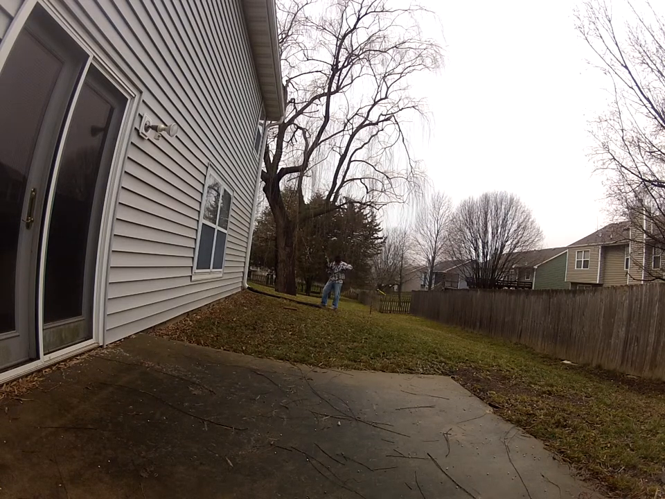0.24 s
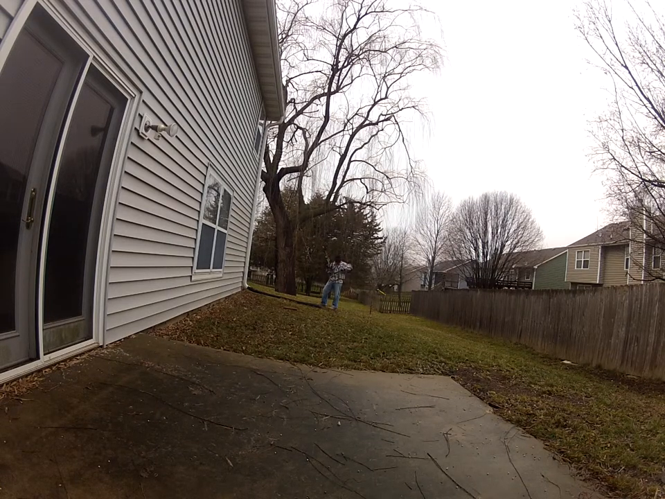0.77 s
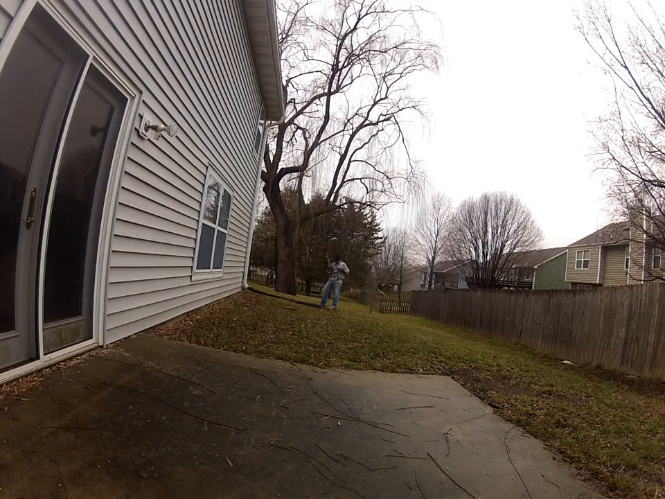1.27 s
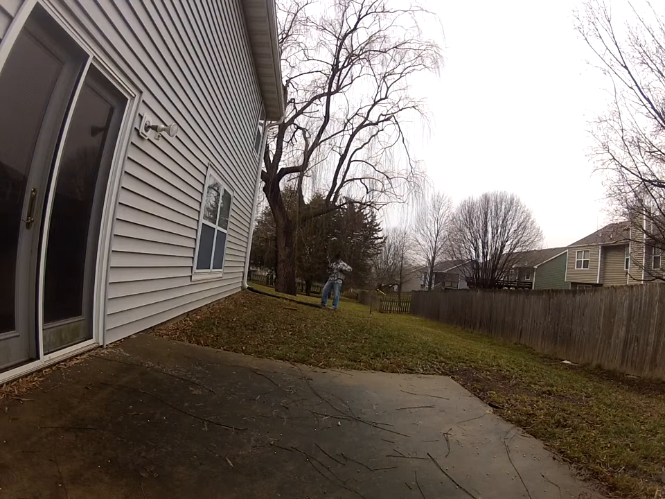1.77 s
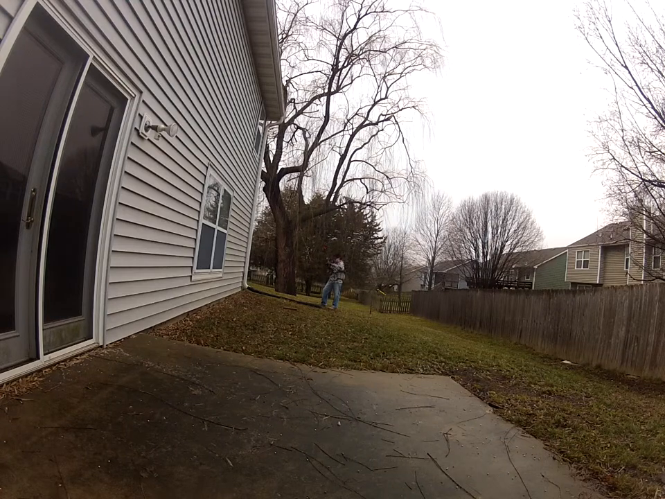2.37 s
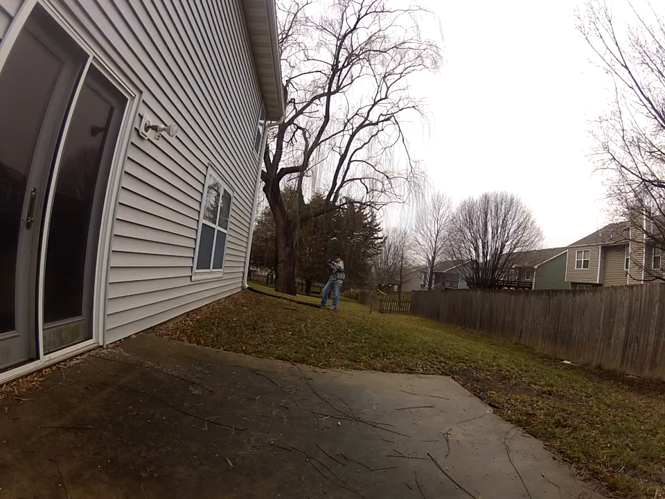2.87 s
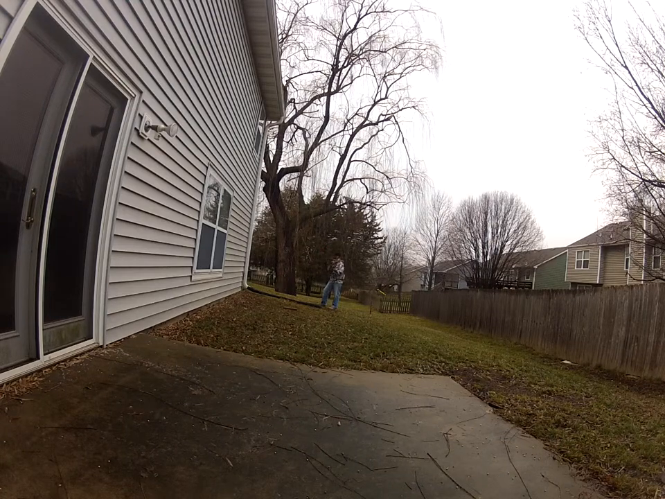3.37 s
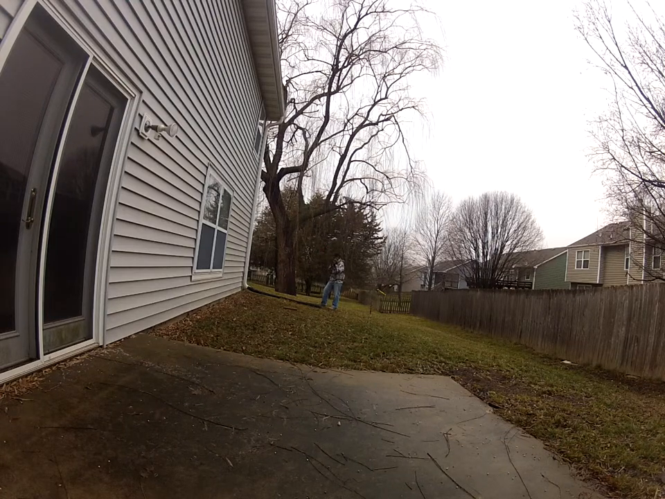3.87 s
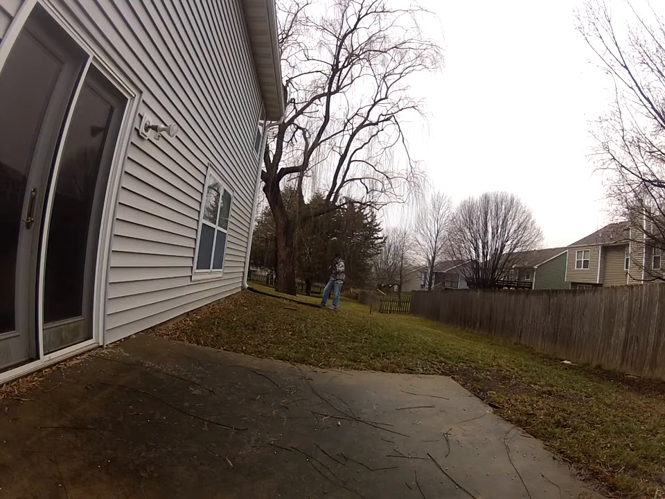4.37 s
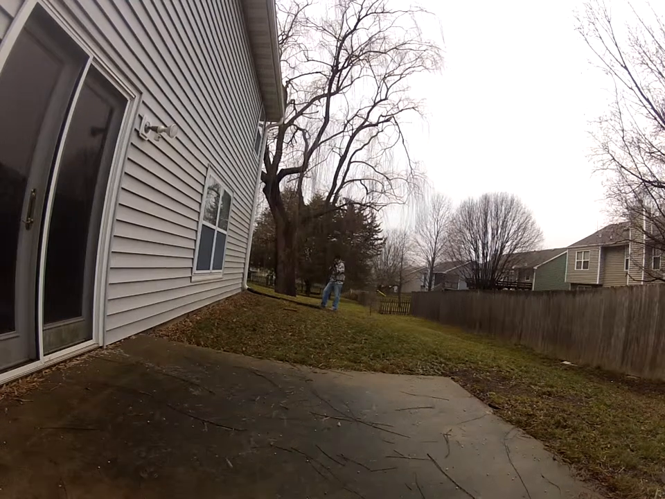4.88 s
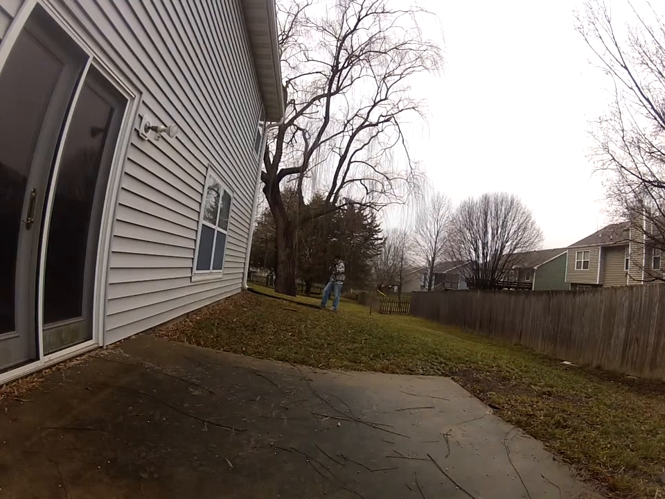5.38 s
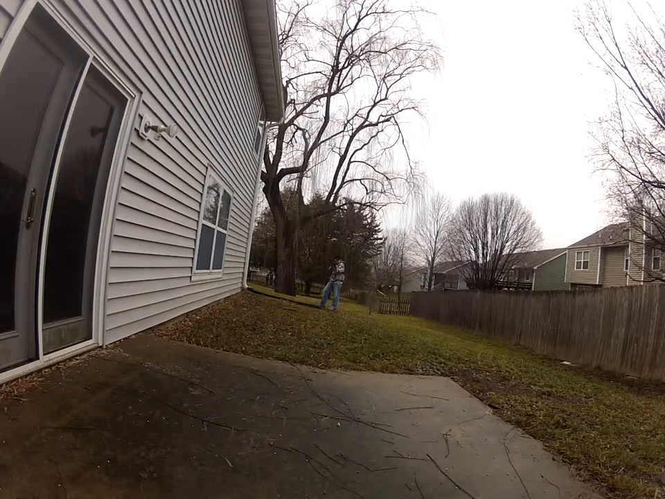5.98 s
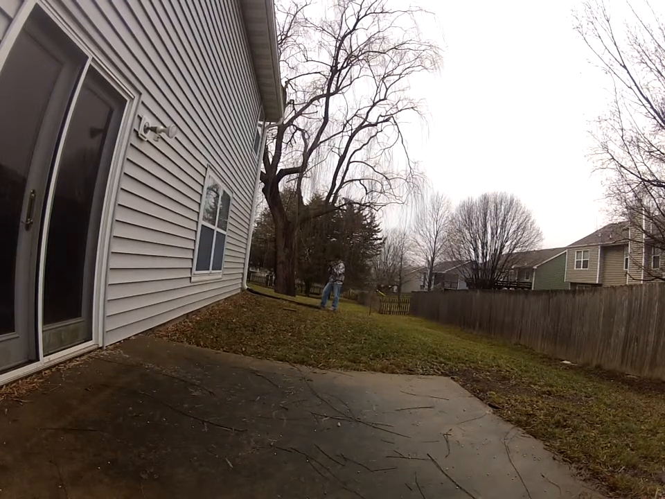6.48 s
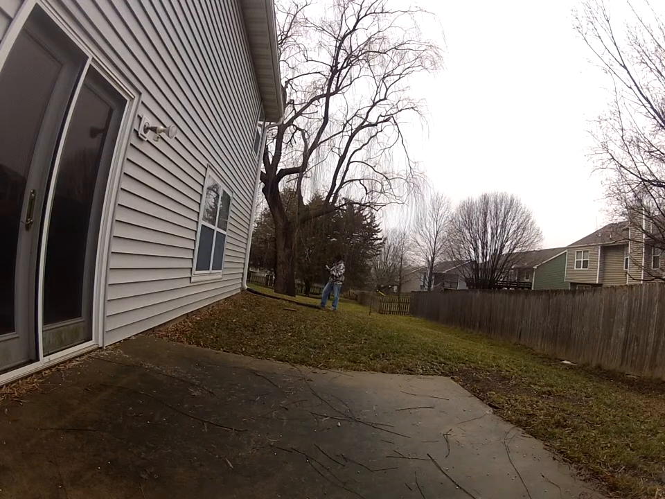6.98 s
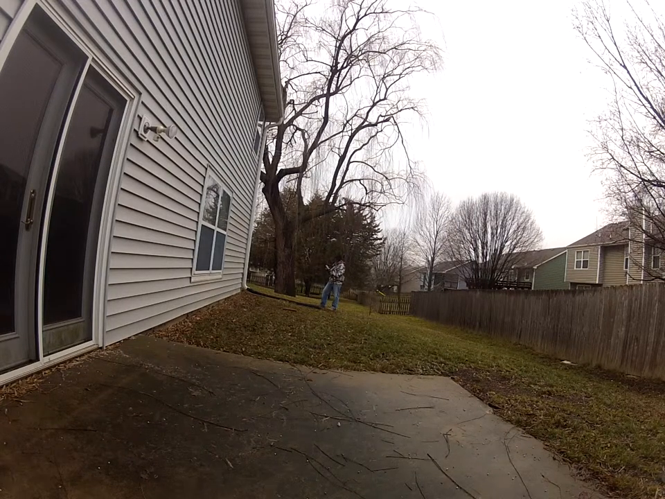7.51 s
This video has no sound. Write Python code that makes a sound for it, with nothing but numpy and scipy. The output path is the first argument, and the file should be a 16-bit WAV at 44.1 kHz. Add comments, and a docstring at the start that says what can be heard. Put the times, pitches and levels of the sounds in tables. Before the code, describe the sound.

Quiet yard with distant traffic rumble, then motorized toy-rifle shots and violent pellet smacks right on the microphone's plastic case, rattling and ringing before falling quiet.

```python
"""An airsoft rifle fires four times across a back yard at a helmet that carries a camera in a plastic case.
Each shot is motor noise, a falling-off low tone and a burst of noise. Three pellets strike: fading tones and
noise overload the microphone, the gain dives, and the helmet's ring and rattle swell as it recovers.
One pellet only grazes, with soft thuds and clicks; strays clack on the house siding as short ringing noise,
and one faint tick comes late. Before the shots, a few scuffs of shaped noise over a far traffic rumble,
which is low-pitched noise."""
import sys
import numpy as np
from scipy import signal
from scipy.fft import rfft, irfft, next_fast_len
from scipy.io import wavfile
from scipy.ndimage import uniform_filter1d

SR = 44100
rng = np.random.default_rng(int(sys.argv[2]) if len(sys.argv) > 2 else 0)


def int16_out(signal):
    """Quantize to a 16-bit WAV file."""
    q = np.round(np.clip(np.atleast_2d(signal).T, -1, 1) * 32767)
    wavfile.write(sys.argv[1], SR, q.astype(np.int16))


N = 341598
T = np.arange(SR) / SR  # one second of time, the length of each single sound

# Direct hits; where one lands sets its body tones, its chatter and how the mount shakes:
# start_s, push_hz, push_db, knock_hz, knock_db, flex_hz, flex_db, shell_db, spread_s, chatter_s,
# sway_db, shake_db (sway_db and shake_db are relative)
DIRECT_HITS = [(4.7371, 44, 8.5, 546, 2.5, 310, 2, -8.5, 0.0023, 0.012, 1, -2.5),
               (5.6436, 115.9, -1, 710, -3.5, 1940, -2.5, -8.5, 0.0012, 0.0078, -16.5, -15.5),
               (6.1167, 41.9, 2, 653, 6.5, 197.3, 4, -7.5, .001, 0.0051, -1.5, -6.5)]
# Ringing tones of the camera's plastic case: pitch_hz, relative_level_db, t60_s (time to fall 60 dB)
SHELL_TONES = [(957, -8.5, 0.045), (1200, -13, 0.085), (1642, -6.5, .04), (1919, -3.5, 0.07),
               (2644, -5.5, 0.013), (3024, -4, .022), (3788, 1.5, 0.031), (4210, -3.5, 0.014),
               (4390, -5, .022), (5110, -0.5, .018), (5557, -5, 0.015), (6690, -5.5, 0.024),
               (7270, -8, 0.03), (8190, -3.5, 0.022)]
# The camera swinging on its mount: pitch_hz, relative_level_db, t60_s
MOUNT_SWAY = (102, -17.5, 0.52)
# Ringing tones of the helmet: pitch_hz, relative_level_db, t60_s
HELMET_TONES = [(261, -13.5, .22), (425, -40, 1), (705, -33, .64), (718, -7, 0.074)]
# A glancing pellet touches twice: start_s, thud_db, thud_hz, click_db, click_ring_hz
GRAZE_TOUCHES = [(5.2099, 6, 370, -28, 2200), (5.227, -9.5, 252, -14, 4870)]
# Clacks of stray pellets on hard things nearby, and one late faint tick:
# start_s, clack_db, t60_s, ring_hz, tail_db, boom_db
CLACKS_AND_TICK = [(5.4978, -35.5, 0.02, 1202, -42.5, -48), (5.7378, -24, 0.05, 2600, -26, -31),
                   (5.783, -11.5, 0.019, 3300, -32.5, -24.5), (5.788, -8.5, 0.02, 4440, -32.5, -58),
                   (7.556, -38.5, 0.01, 2970, -85, -88.5)]
# Scuffs of clothes and feet: start_s, level_db, rise_s, low_edge_hz, high_edge_hz, ring_hz
SCUFF_STROKES = [(.905, -61, 0.028, 1810, 3900, 2180), (2.3541, -49.5, 0.0015, 340, 1590, 574),
                 (2.511, -53, 0.016, 380, 1900, 1260), (2.636, -48, 0.0044, 450, 20000, 2970),
                 (2.652, -40, 0.0053, 350, 13000, 1160), (3.199, -62, 0.063, 1490, 4500, 2100),
                 (3.279, -54.5, 0.0012, 2700, 14000, 4800)]
# How the case colours all sound from outside: frequency_hz, level_db
CASE_COLOUR = [(60, -2.5), (400, 2), (650, 0), (850, -15), (1500, -15), (1800, -15.5), (3000, -11.5),
               (4700, -8), (6100, -25), (7500, -12), (9000, -20), (10500, -31), (13000, -32),
               (15000, -29.5)]
# Colour of the case's chatter: frequency_hz, level_db
CRACK_COLOUR = [(80, -11), (230, 7.5), (450, 10), (850, 2), (1700, -0.5), (4000, -9), (8000, -8),
                (11000, -17.5), (15000, -19)]
# Colour of hard plastic contact: frequency_hz, level_db
CLACK_COLOUR = [(500, -0.5), (1000, 3.5), (2200, 6), (4500, -4.5), (8000, 0), (15000, 7)]
# Colour of rubbing cloth: frequency_hz, level_db
CLOTH_COLOUR = [(200, 9.5), (600, 3.5), (1500, 10), (2800, 8), (4200, 2), (7000, 6), (15000, 14)]
# Colour of far traffic and hiss: frequency_hz, level_db
AIR_COLOUR = [(20, -12), (45, -3), (75, -1.5), (135, -1), (200, -4.5), (350, -11.5), (650, -17.5),
              (950, -26.5), (2800, -32.5), (5000, -38), (8000, -41.5), (15000, -44.5), (16500, -61.5)]
# Phase mismatch of the two channels: frequency_hz, side_over_mid_db
CHANNEL_SKEW = [(60, -26), (250, -25.5), (600, -31), (2000, -29), (12000, -32)]

FLIGHT_S = 0.0755  # from each report to its pellet's arrival
REPORT_DB = -30  # every report is equally loud
WINDUP_S, REPORT_ATTACK_S = 0.068, 0.0013
CRACK_DB, RING_DB = -1, -0.5  # the crack over the shell's level; the helmet rings alike for every hit
BUZZ_DB, ECHO_DB = -7, -35  # over the hit's shake level
# The mount clacks at both ends of each swing
RATTLE_DELAY_S, RATTLE_JITTER_S = 0.0315, 0.001  # first clack after the hit; random shift either way
RATTLE_DB, BACKSWING_DB = 1, -6  # over the hit's shake level; the weaker end compared with the other
RATTLE_LOSS_DB_PER_S, RATTLE_SCATTER_DB = 260, 5  # loss of strength; random level either way
RATTLE_LOOSE_S = 0.11  # by this age a swing has an even chance of still reaching a stop
CLACK_ATTACK_S = 0.0003
CLACK_EDGE = 0.69  # a clack's low edge as a share of its ring frequency
YARD_T60_S, YARD_DB = 0.56, -18  # the yard's long answer, compared with a clack's tail
# A slow stroke also dies slowly: base t60, then extra t60 per second of rise
SCUFF_T60_S, SCUFF_LINGER = 0.22, 3.8
TRAFFIC_DB = -55
# The rumble is a little stronger at first: time of its peak, length, centre, level
SWELL_S, SWELL_LENGTH_S, SWELL_HZ, SWELL_DB = 0.6, 0.61, 127, -56
TOP_HZ = 15700  # the highest pitch that gets through


def amp(db):
    """Turn decibels into a plain multiplier."""
    return 10 ** (np.asarray(db) / 20)


def unit(x):
    """Scale a sound to an average (rms) strength of 1."""
    return x / np.sqrt(np.mean(x ** 2) + 1e-20)


def colour(points, hz):
    """Read a gain curve from its points, joined by lines on a log frequency axis."""
    point_hz, db = np.transpose(points)
    return amp(np.interp(np.log(hz + 1), np.log(point_hz), db))


def filtered(x, response):
    """Make each frequency of x stronger or weaker, or shift its phase, as the response says."""
    size = next_fast_len(x.shape[-1] + 8192)  # spare room so the end does not wrap to the start
    spectrum = rfft(x, size) * response(np.fft.rfftfreq(size, 1 / SR))
    return irfft(spectrum, size)[..., :x.shape[-1]]


def noise(response, size=SR):
    """Coloured noise of rms 1."""
    return unit(filtered(rng.standard_normal(size), response))


def outside(points, edge_hz, top_hz=30000, ring_hz=0, ring_db=4):
    """Noise between a low and a high edge, with a resonance at ring_hz, heard through the case."""
    def response(hz):
        low_edge = 1 / np.hypot(1, (edge_hz / (hz + 1)) ** 4)
        high_edge = 1 / np.hypot(1, (hz / top_hz) ** 2)
        ring = 1 + amp(ring_db) / (1 + ((hz - ring_hz) / (0.06 * ring_hz + 1)) ** 2)
        return colour(CASE_COLOUR, hz) * colour(points, hz) * low_edge * high_edge * ring
    return noise(response)


def fade(t60):
    """A smooth dying away that falls 60 dB in t60 seconds."""
    return np.exp(-np.log(1000) * T / t60)


def rise(seconds):
    """A soft start."""
    return 1 - np.exp(-(T / seconds) ** 2)


def tone(hz, phase=0):
    """One second of a sine, the purest tone."""
    return np.sin(2 * np.pi * hz * T + phase)


def grains(depth_db):
    """A gain that wanders at random within about two milliseconds, which sounds gritty."""
    return amp(depth_db * unit(uniform_filter1d(rng.standard_normal(SR), size=90)))


def add(track, s, sound):
    """Mix a sound into the track at time s."""
    part = track[round(s * SR):][:len(sound)]
    part += sound[:len(part)]


def rifle(motor_db=-21, thump_db=3, thump_hz=370, port_lag=0.0029, yard_db=-18):
    """The motor winds the piston back, then the piston thumps and the report scatters along the wall.

    The levels here are relative to the report."""
    out = np.zeros(N)
    # same path, so the same pattern for each shot
    report = noise(lambda hz: colour(CASE_COLOUR, hz)) * fade(0.24) * rise(REPORT_ATTACK_S)
    windup = np.clip(T / WINDUP_S, 0, 1) ** 0.81 * (T < WINDUP_S)
    for arrival, *_ in DIRECT_HITS + GRAZE_TOUCHES[:1]:
        s = arrival - FLIGHT_S
        gears = outside(CLACK_COLOUR, edge_hz=860) * windup
        thump = -amp(thump_db) * tone(thump_hz) * fade(0.016) * rise(0.0004)
        answer = amp(yard_db) * outside(CLACK_COLOUR, edge_hz=790) * fade(0.59) * rise(0.018)
        add(out, s - WINDUP_S + port_lag, amp(motor_db) * gears)
        add(out, s, thump)
        add(out, s + port_lag, report + answer)
    return amp(REPORT_DB) * out


def ringing_shell(chatter, spread, contact):
    """The plastic case rings at many pitches, strongly while it chatters and weakly after."""
    tones = sum(amp(db) * tone(hz, rng.uniform(0, 2 * np.pi)) * fade(t60) for hz, db, t60 in SHELL_TONES)
    shell = tones * (chatter + 0.14 * rise(spread))
    return shell / np.std(shell[:round(contact * SR)])


def hits():
    """A pellet shoves the case, rings its shell and sets the helmet and the camera mount swinging."""
    out = np.zeros(N)
    sway_hz, sway_level_db, sway_t60 = MOUNT_SWAY
    for (s, push_hz, push_db, knock_hz, knock_db, flex_hz, flex_db,
         shell_db, spread, contact, sway_db, shake_db) in DIRECT_HITS:
        push = -amp(push_db) * tone(push_hz, phase=0.79) * fade(0.051)
        # the blow takes some milliseconds to spread; where it lands picks the body tones
        body = amp(knock_db) * tone(knock_hz) + amp(flex_db) * tone(flex_hz)
        body = body * rise(0.0032) * fade(0.044)
        # the case chatters against its mount, which then damps it
        chatter = rise(spread) / (1 + (T / contact) ** 8)
        shell = amp(shell_db) * ringing_shell(chatter, spread, contact)
        crack = amp(shell_db + CRACK_DB) * noise(lambda hz: colour(CRACK_COLOUR, hz)) * chatter
        sway = amp(sway_db + sway_level_db) * tone(sway_hz) * fade(sway_t60)
        ring = amp(RING_DB) * sum(amp(db) * tone(hz) * fade(t60) for hz, db, t60 in HELMET_TONES)
        # the mount ticks at both ends of each swing, each tick with its own random strength
        swings = 2 * sway_hz * T
        ticks = amp(4 * rng.standard_normal(SR))[swings.astype(int)] * np.exp(-4 * (swings % 1))
        buzz = (0.4 + 1.5 * ticks) * outside(CLACK_COLOUR, edge_hz=160) * fade(0.19)
        echo = outside(CLACK_COLOUR, edge_hz=2900) * rise(0.05) * fade(0.45)
        shaking = amp(BUZZ_DB + shake_db) * buzz + amp(ECHO_DB + shake_db) * echo
        add(out, s, push + body + shell + crack + sway + ring + shaking)
    return out


def rattle(count=30):
    """After each hit the swinging mount clacks against its stops, ever weaker and missing them more often."""
    out = np.zeros(N)
    for s, *_, shake_db in DIRECT_HITS:
        for k, (late, luck, reach) in enumerate(rng.uniform(size=(count, 3))):
            age = RATTLE_DELAY_S + k / (2 * MOUNT_SWAY[0]) + RATTLE_JITTER_S * (2 * late - 1)
            db = RATTLE_DB + shake_db - RATTLE_LOSS_DB_PER_S * age
            db += BACKSWING_DB * (k % 2) + RATTLE_SCATTER_DB * (2 * luck - 1)
            touches = reach < 1 / (1 + (age / RATTLE_LOOSE_S) ** 3)
            clack = outside(CLACK_COLOUR, edge_hz=2200, top_hz=8500) * fade(0.0094)
            add(out, s + age, touches * amp(db) * clack)
    return out


def graze(thud_t60=0.0058, click_t60=0.015, click_edge_hz=1100, click_lag=0.00045, tail_db=-29):
    """A glancing pellet: each touch is a soft thud and a click with a short gritty tail."""
    out = np.zeros(N)
    for s, thud_db, thud_hz, click_db, ring_hz in GRAZE_TOUCHES:
        thud = amp(thud_db) * tone(thud_hz) * fade(thud_t60) * rise(0.001)
        decay = fade(click_t60) + amp(tail_db) * grains(depth_db=3) * fade(0.21)
        click = outside(CLACK_COLOUR, click_edge_hz, ring_hz=ring_hz) * decay * rise(CLACK_ATTACK_S)
        add(out, s, thud)
        add(out, s + click_lag, amp(click_db) * click)
    return out


def clacks_and_tick(siding_hz=545, siding_width_hz=130, grain_db=4.5):
    """Stray pellets clack on siding and patio and the yard answers; a late faint tick is made alike."""
    out = np.zeros(N)
    for s, db, t60, ring_hz, tail_db, boom_db in CLACKS_AND_TICK:
        edge_hz = CLACK_EDGE * ring_hz
        clack = outside(CLACK_COLOUR, edge_hz, ring_hz=ring_hz, ring_db=8.5) * fade(t60) * rise(CLACK_ATTACK_S)
        # the laps of the siding scatter a clack into a gritty tail; the tick has next to none
        tail = outside(CLACK_COLOUR, 0.88 * edge_hz, ring_hz=ring_hz) * grains(grain_db)
        tail = tail * (fade(0.14) + amp(YARD_DB) * fade(YARD_T60_S))
        boom = noise(lambda hz: 1 / (1 + ((hz - siding_hz) / siding_width_hz) ** 2)) * fade(0.16)
        add(out, s, amp(db) * clack + amp(tail_db) * tail + amp(boom_db) * boom)
    return out


def scuffs(grain_db=1.0, yard_db=-19):
    """Short grainy rubs of cloth and dead leaves, with a faint answer from the yard."""
    out = np.zeros(N)
    for s, db, rise_s, edge_hz, top_hz, ring_hz in SCUFF_STROKES:
        t60 = SCUFF_T60_S + SCUFF_LINGER * rise_s
        # the fade only sets in after one rise time
        stroke = rise(rise_s) * np.minimum(1, fade(t60) * amp(60 * rise_s / t60))
        rub = outside(CLOTH_COLOUR, edge_hz, top_hz, ring_hz) * grains(grain_db) * stroke
        answer = outside(CLOTH_COLOUR, edge_hz=1600, top_hz=4000) * rise(0.1) * fade(0.76)
        add(out, s, amp(db) * (rub + amp(yard_db) * answer))
    return out


def traffic(dip_hz=6000, dip_width_hz=450, dip_db=-8, swell_width_hz=80):
    """A far rumble with one slow swell, under faint hiss with the notch of the case."""
    def steady_colour(hz):
        notch = amp(dip_db * np.exp(-((hz - dip_hz) / dip_width_hz) ** 2))
        return colour(AIR_COLOUR, hz) * notch
    steady = noise(steady_colour, size=N)
    swell = noise(lambda hz: 1 / (1 + ((hz - SWELL_HZ) / swell_width_hz) ** 2), size=N)
    swell_shape = np.exp(-((np.arange(N) / SR - SWELL_S) / SWELL_LENGTH_S) ** 2)
    return amp(TRAFFIC_DB) * steady + amp(SWELL_DB) * swell * swell_shape


def scene():
    """Everything reaches one microphone inside the case."""
    mono = rifle() + hits() + rattle() + graze() + clacks_and_tick() + scuffs() + traffic()
    return np.array([mono, mono])


def gain_control(x, depth_db=35, recover_db_per_s=305, lag=0.0061, attack=0.011):
    """An overload makes the gain dive a moment later; it then climbs back at a steady rate."""
    t = np.arange(N) / SR
    overload = uniform_filter1d(np.abs(x[0]), size=130) > 0.65  # average strength over about 3 ms
    recovery_db = recover_db_per_s * t
    cut_db = np.maximum.accumulate(depth_db * overload + recovery_db) - recovery_db
    # smooth the cut so that the gain does not jump
    pole = np.exp(-1 / (attack * SR))
    cut_db = signal.lfilter([1 - pole], [1, -pole], cut_db)
    return x * amp(-np.interp(t - lag, t, cut_db))


def record(dry, low_cut_hz=26):
    """Two channels slightly apart in phase, gain control, a DC blocker, clipping and the band limit."""
    def phase_split(hz):
        angle = colour(CHANNEL_SKEW, hz) * hz / (hz + 10)
        return np.exp(1j * np.array([[1], [-1]]) * angle)
    controlled = gain_control(filtered(dry, phase_split))
    # the blocker swings back after each push
    blocked = signal.lfilter(*signal.butter(1, low_cut_hz, "high", fs=SR), controlled)
    clipped = np.clip(blocked, -0.98, 0.98)
    return filtered(clipped, lambda hz: 1 / np.hypot(1, (hz / TOP_HZ) ** 60))


dry = scene()
out = record(dry)
int16_out(out)
```